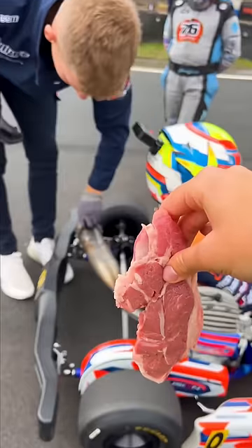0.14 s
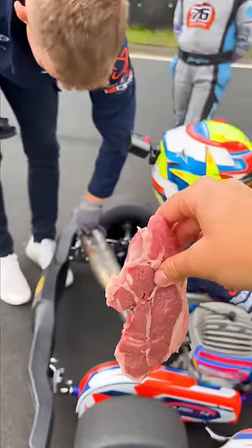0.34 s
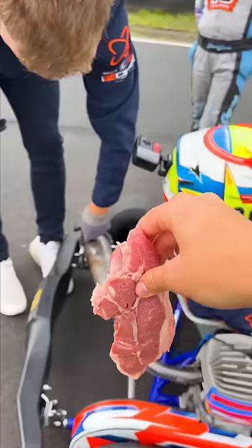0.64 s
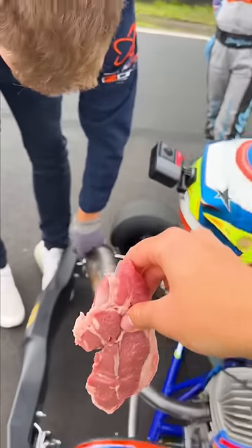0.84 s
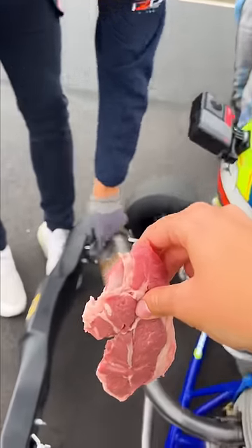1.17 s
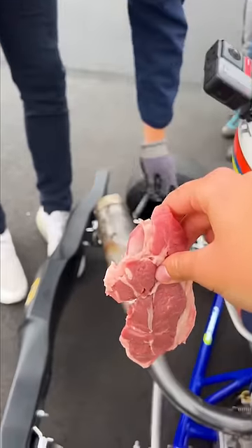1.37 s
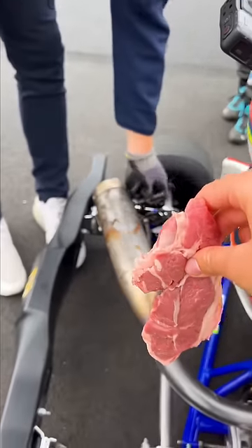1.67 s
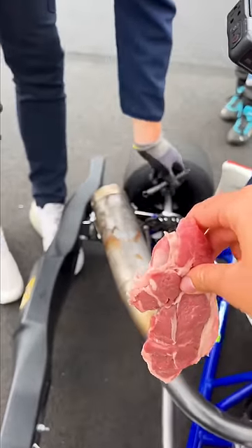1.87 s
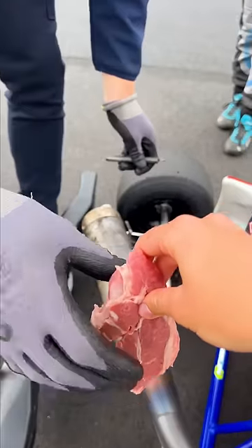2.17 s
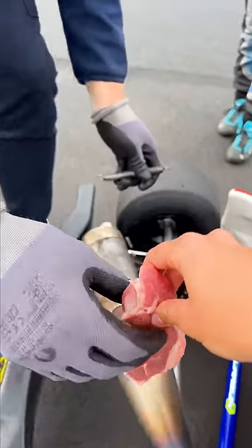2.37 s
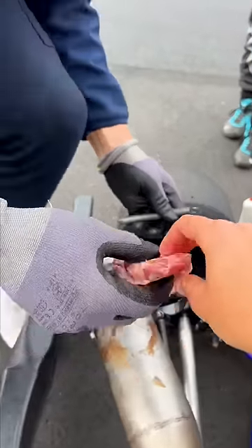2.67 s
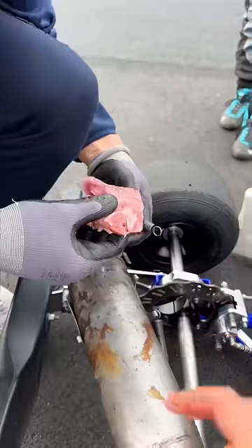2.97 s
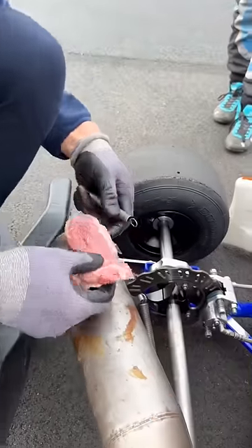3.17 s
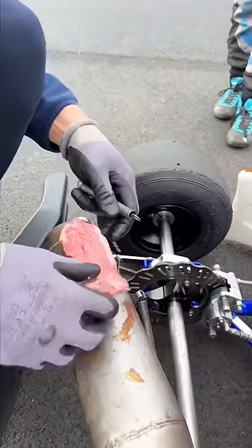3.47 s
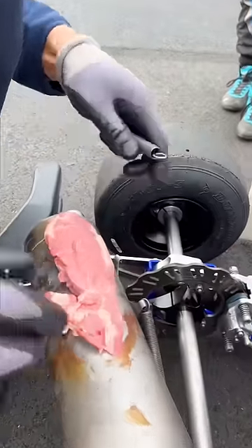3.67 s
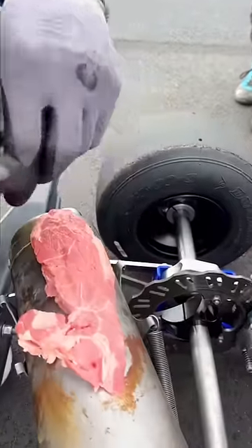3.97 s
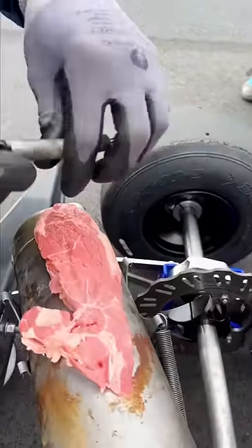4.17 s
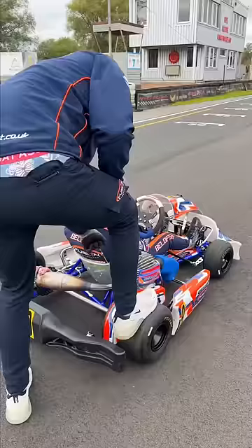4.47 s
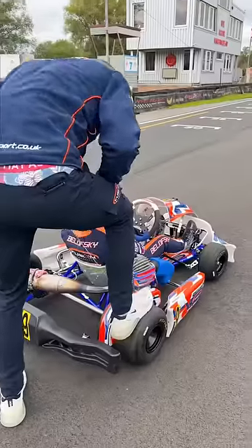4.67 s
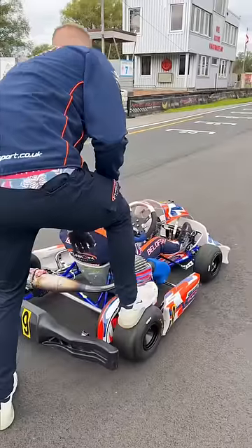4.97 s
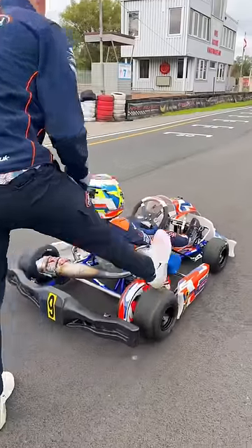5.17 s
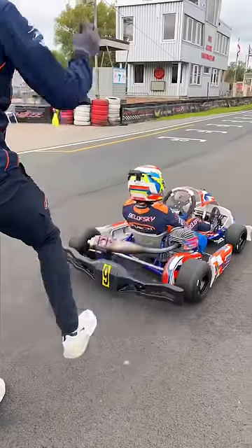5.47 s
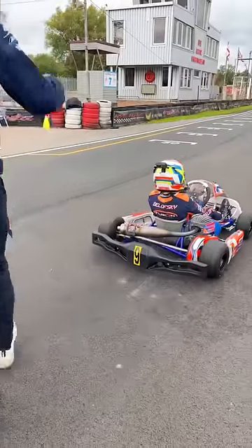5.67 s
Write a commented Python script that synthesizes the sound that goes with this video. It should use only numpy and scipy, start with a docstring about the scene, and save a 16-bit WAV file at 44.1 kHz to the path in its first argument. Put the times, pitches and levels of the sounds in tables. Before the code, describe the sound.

Quiet rustling and tool taps give way to a sizzle of meat, cut off by a go-kart engine starting and pulling away.

```python
"""A small two-stroke kart engine catches, fires every other turn, climbs to a steady drone and pulls away.
Its firings make a low pressure hump, a buzz of shaft orders and puffs of gas that ring the pipe.
Before it, and ended by a cut, comes a pit lane: low outdoor rumble, rustling shoes and sleeves, metal
clicks, one squeak of a spring, then meat sizzling on a hot exhaust. All of it is heard on a phone."""
import sys
import numpy as np
from scipy import signal
from scipy.fft import rfft, irfft, next_fast_len
from scipy.io import wavfile
from scipy.ndimage import uniform_filter1d

SR = 44100
rng = np.random.default_rng(int(sys.argv[2]) if len(sys.argv) > 2 else 0)


def store_pcm(level_fs):
    """Save levels as 16-bit WAV."""
    pcm = np.round(np.clip(level_fs, -1, 1) * 32767).astype(np.int16)
    wavfile.write(sys.argv[1], SR, np.atleast_2d(pcm).T)


N = 257544
T = np.arange(N) / SR


def amp(db):
    return 10 ** (np.asarray(db) / 20)


def unit(x):
    return x / np.sqrt(np.mean(x ** 2) + 1e-20)


def along(points, hz):
    """Read (Hz, value) points on a log frequency axis."""
    freqs, values = np.transpose(points)
    return np.interp(np.log(hz + 1), np.log(freqs + 1), values)


def curves(rows):
    """One value per sample for each column after the time."""
    times, *columns = np.transpose(rows)
    return [np.interp(T, times, column) for column in columns]


def span(rows):
    """A gate, open while a table lasts, with 3 ms edges."""
    return np.clip(np.minimum(T - rows[0][0], rows[-1][0] + .003 - T) / .003, 0, 1)


def wobble(rate):
    """A random curve, rate knots a second."""
    knots = rng.standard_normal(int(N * rate / SR) + 4)
    return np.interp(T * rate, np.arange(len(knots)), knots)


def filtered(x, response):
    """Pass x through a complex frequency response."""
    size = next_fast_len(N + SR // 2)
    return irfft(rfft(x, size) * response(np.fft.rfftfreq(size, 1 / SR)), size)[..., :N]


def modes(table):
    """Causal response of a set of resonances, alternating in sign."""
    return lambda f: sum((-1) ** k * amp(db) * 1j * f * width / (hz * hz - f * f + 1j * f * width)
                         for k, (hz, width, db) in enumerate(table))


def rush(spectrum=((20, 0),), patchy_db=0, grit_db=0):
    """Stereo noise of rms 1 with patches of random gain; grit makes it spiky."""
    cells = signal.stft(rng.standard_normal((2, N)) * amp(grit_db * wobble(1500)), nperseg=512)[2]
    patches = uniform_filter1d(uniform_filter1d(rng.standard_normal(cells.shape[1:]), 6, 0), 10, 1)
    pair = signal.istft(cells * amp(patchy_db * unit(patches)), nperseg=512)[1][:, :N]

    def colour_and_width(hz):
        angle = np.arccos(np.clip(ports(LIKENESS, hz), -1, 1)) / 2
        return amp(along(spectrum, hz)) * [np.cos(angle), np.sin(angle)]
    mid, side = filtered(pair, colour_and_width)
    return unit(np.array([mid + side, mid - side]))


def bursts(rows, colour, t60_s, pan_db=1):
    """A dying burst of grit at each (seconds, dB); positive pan leans left."""
    envelope, t = np.zeros(N + SR), np.arange(SR // 4) / SR
    for s, db in rows:
        envelope[round(s * SR):][:len(t)] += amp(db - 60 * t / t60_s) * (1 - np.exp(-t / 0.00082))
    return envelope[:N] * amp([[pan_db / 2], [-pan_db / 2]]) * rush(colour, patchy_db=3, grit_db=-2.5)


# Colours of the outdoor bed. Each row: frequency in Hz, relative level in dB.
RUMBLE = [(25, -30), (45, 16), (60, 18.5), (95, 14), (140, -42.5)]
DRONE = [(70, -2.5), (120, 8.5), (200, 5.5), (300, -41)]
TRAFFIC = [(130, -23.5), (220, -6.5), (326, -9), (371, -9.5), (642, -18.5), (868, -24.5), (1200, -28),
           (1460, -35), (5000, -56), (6500, -74), (11000, -120)]
# The bed's fader moves. Each row: time in seconds, rumble in dB, drone in dB.
AIR_LEVELS = [(0, -38.5, -50), (.13, -42, -38), (.24, -43, -42), (.32, -56, -60), (1.2, -58.5, -48),
              (1.8, -46.5, -47.5), (2.43, -51, -45.5), (2.7, -50, -43), (3.2, -48.5, -49),
              (3.85, -45, -43.5), (4.4, -49, -45.5), (4.45, -37, -39), (4.486, -35, -39)]
CUT_S = 4.486


def air():
    """Wind and far engines: a lumpy rumble and drone under dull traffic, up to the cut."""
    rumble_db, drone_db = curves(AIR_LEVELS)
    rumble = amp(rumble_db + 2.1 * wobble(7)) * rush(RUMBLE, patchy_db=-0.1)
    drone = amp(drone_db + 1.6 * wobble(16)) * rush(DRONE, patchy_db=0.4)
    passing_db = 5.5 * np.exp(-T / 0.35)  # a pass dies away at the start
    traffic = amp(-49.5 + passing_db + 0.96 * wobble(2.74)) * rush(TRAFFIC, patchy_db=2)
    return span([(0,), (CUT_S,)]) * (rumble + drone + traffic)


# Colours of soles and sleeves. Each row: frequency in Hz, relative level in dB.
SCUFF = [(410, -33), (700, 1), (1400, -1.5), (3370, -4.5), (3930, -10), (6180, -16.5), (7000, -17.5),
         (9100, -31), (15400, -120)]
CLOTH = [(2500, -25), (4500, -3), (6500, 0), (9000, -4), (12000, -7), (14000, -12), (16300, -18)]
# Body moves. Each row: peak time, rise and fall in seconds, scuff in dB, cloth in dB.
STROKES = [(.1, .08, 0.1, -57, -72), (.62, 0.18, 0.27, -54.5, -85), (.79, 0.1, 0.064, -52.5, -61.5),
           (.97, 0.053, 0.074, -55, -56.5), (1.094, 0.043, 0.061, -54.5, -52),
           (1.56, 0.067, 0.086, -69, -65), (1.9, 0.12, 0.13, -57, -52.5), (2.07, 0.15, 0.048, -55, -53.5),
           (2.2, 0.058, 0.032, -47, -50.5), (2.24, .03, 0.023, -47, -56),
           (2.431, 0.092, 0.037, -49.5, -61.5), (2.53, .07, 0.084, -60, -60.5),
           (2.62, 0.043, 0.17, -54, -59.5), (2.86, 0.17, 0.16, -69.5, -63), (3.148, .012, .015, -54, -59)]
STILL_SCUFF_DB, STILL_CLOTH_DB, RUSTLE_END_S = -61.5, -76, 3.184


def rustle():
    """Soles scuff on tarmac and jackets brush; each stroke swells and fades like a bell curve."""
    power = amp([[STILL_SCUFF_DB], [STILL_CLOTH_DB]]) ** 2
    for peak, rise, fall, *db in STROKES:
        swell = np.exp(-2 * ((T - peak) / np.where(T < peak, rise, fall)) ** 2)
        power = power + amp(db)[:, None] ** 2 * swell
    scuff_gain, cloth_gain = np.sqrt(power)
    scuff = scuff_gain * rush(SCUFF, patchy_db=1.1, grit_db=-1.5)
    cloth = cloth_gain * rush(CLOTH, patchy_db=1.5, grit_db=1.5)
    return span([(0,), (RUSTLE_END_S,)]) * (scuff + tool_ring(scuff) + cloth)


# Resonances of a hand tool. Each row: pitch in Hz, width in Hz, gain in dB.
TOOL_MODES = [(1620, 120, -22.5), (2444, 125, 4), (3320, 56, -26), (4760, 120, 5), (6530, 80, -13)]


def tool_ring(contact):
    """Steel in the hand rings along when rubbed or struck."""
    return amp(2.5) * filtered(contact, modes(TOOL_MODES))


# Colours of a contact, from top edge down to thud. Each row: frequency in Hz, relative level in dB.
SPIT = [(8000, -14.5), (10500, -2), (12500, 4), (16000, -10.5)]
SNAP = [(3000, -9.5), (5000, 0), (7000, 5.5), (9500, -0.5), (12000, -51)]
RING = [(2000, -40), (2250, -6), (2330, 1), (2420, -6), (2700, -39)]
CLACK = [(700, -24), (1500, 2.5), (2400, 3.5), (4000, -5), (6000, -16)]
THUD = [(150, -19), (300, -0.5), (450, -6.5), (800, -3), (1300, -5), (2500, -58)]
# Steel on steel. Each row: start in seconds, level in dB, top edge in dB relative to that.
CLICKS = [(.0928, -54.5, 4.5), (.2033, -52, -3), (0.4296, -41.5, -18), (0.441, -46, -10), (.694, -49, -14),
          (.7294, -46.5, -6), (.758, -50, 7), (.78, -53, -4), (0.8971, -29.5, 1.5), (1.0694, -44, 1),
          (1.0829, -44, -7), (1.11, -51, 0), (1.3796, -47.5, 3), (1.4064, -35.5, 5.5), (1.4312, -43, 0),
          (1.4417, -39, 1), (1.498, -36, 6.5), (1.5126, -36.5, 7.5), (1.5257, -52, 17), (1.603, -51, 19.5),
          (1.614, -53, 4), (2.5853, -53.5, 12.5), (2.7033, -56, -9), (3.1817, -54, 1)]
# Gloves and tools bump the can. Each row: start in seconds, blow in dB, hard edge in dB relative to that.
KNOCKS = [(0.4065, -22, -30), (0.4301, -9.5, -25.5), (.44, -10.5, -35), (0.453, -15.5, -40),
          (.694, -27, -13), (0.8977, -21, -20), (0.9105, -20.5, -28), (.997, -43, -5), (1.0694, -44, -10.5),
          (1.432, -27, -27), (1.5257, -36, -10), (1.87, -29, -22), (2.185, -22.5, -14.5),
          (2.2845, -37, -17.5), (2.4739, -17.5, -45), (2.5775, -22, -45), (2.588, -19, -40),
          (2.6006, -17, -50), (2.621, -21, -33), (2.64, -17.5, -28.5), (2.6544, -20, -37), (2.67, -23, -33),
          (3.028, -57, 3), (3.1428, -31, -17)]
# A steel part hums on. Each row: start in seconds, level in dB.
RINGS = [(.9, -54), (.95, -57), (1.0, -56), (1.072, -48.5), (1.11, -54.5)]
# The hollow exhaust can. Each row: pitch in Hz, width in Hz, gain in dB.
CAN_MODES = [(320, 126, -5.5), (463, 45, -2), (547, 46, -3), (828, 68, -5.5), (1030, 370, -18.5)]


def taps():
    """Clicks ring the tool; knocks ring the hollow can, and their hard edge the tool."""
    snap = bursts([(s, db) for s, db, top in CLICKS], SNAP, t60_s=0.071)
    spit = bursts([(s, db + top) for s, db, top in CLICKS], SPIT, t60_s=0.047)
    clack = bursts([(s, db + edge) for s, db, edge in KNOCKS], CLACK, t60_s=0.08)
    blow = bursts([(s, db) for s, db, edge in KNOCKS], THUD, t60_s=0.028, pan_db=3.5)
    hum = bursts(RINGS, RING, t60_s=0.26)
    return hum + snap + spit + clack + tool_ring(snap + clack) + filtered(blow, modes(CAN_MODES))


# The squeak's envelope. Each row: time in seconds, level in dB.
SQUEAK_LEVELS = [(0.97, -65), (0.994, -30.5), (1.014, -26.5), (1.06, -59)]
# The spring's tones. Each row: pitch in Hz, wavers a second, relative level in dB.
SPRING_TONES = [(10330, 60, 0), (10750, 300, -12), (9900, 400, -17), (11200, 400, -18)]


def squeak():
    """A spring slips over metal and whistles in a few narrow modes."""
    tones = sum(amp(db) * np.sin(2 * np.pi * hz * T + 3.8 * wobble(waver))
                for hz, waver, db in SPRING_TONES)
    level_db = curves(SQUEAK_LEVELS)[0] + 4.1 * wobble(370)
    return span(SQUEAK_LEVELS) * amp(level_db) * unit(tones) * amp([[.3], [-.3]])


# The sizzle's swell. Each row: time in seconds, fizz in dB, seethe in dB relative to the fizz.
FRY_LEVELS = [(3.17, -66.5, -33), (3.184, -48, -3), (3.216, -39.5, -15.5), (3.404, -33.5, -13.5),
              (3.672, -29, -11), (4.376, -30, -8), (4.482, -36, -7.5), (4.486, -37, -3)]
# Its two colours. Each row: frequency in Hz, relative level in dB.
FIZZ = [(1760, -27.5), (3000, -14.5), (4040, -22), (4750, -38.5), (5710, -3), (10600, 0.5), (11700, 3),
        (13700, -2), (15700, -1), (15850, -40)]
SEETHE = [(410, -51), (700, -22), (900, -21.5), (1160, -12.5), (2740, -8.5), (3600, -4), (4040, -0.5),
          (4400, -4.5), (6000, -4.5), (7800, -36), (13200, -120)]


def frying():
    """Juice boils on hot steel: dense, spiky fizz over a duller seethe."""
    fizz_db, seethe_db = curves(FRY_LEVELS)
    fizz = rush(FIZZ, patchy_db=1, grit_db=2.5)
    seethe = rush(SEETHE, patchy_db=1, grit_db=2.5)
    return span(FRY_LEVELS) * amp(fizz_db) * (fizz + amp(seethe_db) * seethe)


# The revs. Each row: time in seconds, shaft turns a second.
REVS = [(4.486, 37.2), (4.55, 41), (4.584, 47), (4.61, 51.72), (4.648, 58.85), (4.704, 67.08),
        (4.756, 70.2), (5.01, 70.8), (5.266, 69.4), (5.598, 70), (5.84, 66.5)]
# The engine's fader. Each row: time in seconds, level in dB, rasp in dB relative to that.
EXHAUST_LEVELS = [(4.486, -32, -8), (4.496, -26, -8), (4.53, -29.5, -8), (4.546, -24.5, -4),
                  (4.576, -27, -4), (4.614, -23, -5), (4.684, -25.5, -1.5), (4.74, -25.5, -4.5),
                  (4.884, -27.5, 2), (4.986, -26, -1.5), (5.058, -27, 3.5), (5.112, -27, -3),
                  (5.376, -30.5, -2), (5.84, -32.5, -4.5)]
# The engine settles. Each row: time in seconds, evenness from 0 to 1.
SETTLING = [(4.486, 0), (4.6, .15), (4.68, 1), (5.84, 1)]
# The kart pulls away. Each row: time in seconds, share of the far colour from 0 to 1.
LEAVING = [(4.486, 0.17), (5.1, 0.17), (5.3, 0.85), (5.84, 1)]
# The first firings, every other turn. Each row: start in seconds, pop in dB.
FIRST_FIRINGS = [(4.5445, -26), (4.588, -24.5), (4.6238, -26)]
# Colours of cranking gears and gas, low roar and pops. Each row: frequency in Hz, relative level in dB.
CRANK = [(240, -34), (400, -2), (791, 0), (894, -14), (1120, 1.5), (1410, -17), (2150, -13), (15000, -42)]
ROAR = [(30, -35.5), (60, -15), (150, 12.5), (350, 4.5), (600, -23.5)]
POP = [(300, -12), (500, 5.5), (1100, 5), (2000, -4.5), (3500, -4.5), (5300, -9), (9000, -6.5),
       (15000, -17)]
SPEED, EVEN, AWAY = curves(REVS)[0], curves(SETTLING)[0], curves(LEAVING)[0]
EXHAUST_DB, RASP_DB = curves(EXHAUST_LEVELS)


def engine():
    """A two-stroke cranks, catches with separate pops, then fires once a turn."""
    turns = np.cumsum(SPEED * span(REVS)) / SR + .14
    kicks = firings(turns)
    running = pressure_hump(turns) + buzz(turns) + gas_puffs(kicks) + piston_tick(kicks)
    crank = amp(-35) * (1 - EVEN) * rush(CRANK, patchy_db=1)
    roar = amp(EXHAUST_DB + by_stage(-7, -9.5, -13)) * rush(ROAR, patchy_db=3.5)
    pops = bursts(FIRST_FIRINGS, POP, t60_s=0.095, pan_db=0)
    return span(REVS) * (running + crank + roar) + pops


def by_stage(catching, near, leaving):
    """Crossfade a setting through the three stages of the run."""
    return (1 - EVEN) * catching + EVEN * ((1 - AWAY) * near + AWAY * leaving)


def unit_at_speed(x):
    """Scale to rms 1 over the steady drone."""
    return x / np.sqrt(np.mean(x[..., T > 4.8] ** 2))


def firings(turns):
    """One impulse of slightly random strength for each ignition."""
    first_s = np.transpose(FIRST_FIRINGS)[0]
    new_turn = np.flatnonzero(np.diff(np.floor(turns))) + 1
    fired = np.r_[np.round(first_s * SR).astype(int), new_turn[T[new_turn] > first_s[-1] + .01]]
    kicks = np.zeros(N)
    kicks[fired] = amp(rng.standard_normal(200)[:len(fired)])
    return kicks


# The silencer's low colour. Each row: frequency in Hz, gain in dB.
BOOM = [(38, -25), (50, -17), (62, -4), (70, -3.5), (78, 4), (113, 1.5), (140, 1), (170, -3.5), (210, -7.5),
        (280, -6.5)]


def pressure_hump(turns):
    """The four lowest shaft orders add up to one pressure hump that peaks late in the turn."""
    level_db = EXHAUST_DB + by_stage(-1.5, 0, 2.4)
    hump = 0
    for order in range(1, 5):
        thinning_db = AWAY * order  # 1 dB per order once far
        db = level_db - thinning_db + along(BOOM, order * SPEED) + 0.43 * order * wobble(12)
        hump += np.sqrt(2) * amp(db) * np.cos(2 * np.pi * order * (turns - .55) + .5 * wobble(5))
    return hump


# The pipe's colour, near and far. Each row: shaft order at cruising speed, relative level in dB.
NEAR_ORDERS = [(1, -3), (2, 0), (3, 21.5), (4, -17), (5, -16), (6, -41), (7, -25.5), (8, -22), (9, -24),
               (10, -13.5), (11, -10.5), (12, -27), (13, -19.5), (14, -16), (15, -8.5), (16, -9.5),
               (17, -14), (18, -21), (19, -24), (20, -41), (21, -43)]
FAR_ORDERS = [(1, -4), (2, 13), (3, 2), (4, -7), (5, -14.5), (6, -17.5), (7, -11), (8, -6), (9, -15.5),
              (10, -20), (11, -10), (12, -18), (13, -31), (14, -22), (15, -35), (16, -8.5), (17, -20.5),
              (18, -17), (19, -32), (20, -30), (21, -25), (22, -21), (23, -20), (24, -35), (25, -39),
              (26, -21), (27, -43), (28, -45), (29, -26), (30, -10.5), (31, -22), (32, -46)]
# Parts that sing at their own pitch. Each row: pitch in Hz, relative level in dB.
PANELS = [(1590, 2.5), (1728, 1.5), (1842, -3.5), (2150, -2)]
CRUISE_HZ = 70


def buzz(turns):
    """Higher shaft orders slide through the pipe's colour, each wavering alone; panels sing while near."""
    orders = 0
    for order in range(5, 33):
        near_db, far_db = (np.interp(order * SPEED / CRUISE_HZ, *np.transpose(colour), right=-34)
                           for colour in (NEAR_ORDERS, FAR_ORDERS))
        db = (1 - AWAY) * near_db + AWAY * far_db + 3.24 * wobble(12) + (RASP_DB + 4) * (order > 20)
        orders += amp(db) * np.sin(2 * np.pi * (order * turns + rng.random()) + 0.44 * wobble(12))
    panels = sum(amp(db + 2.9 * wobble(16)) * np.sin(2 * np.pi * hz * T + 1.76 * wobble(25))
                 for hz, db in PANELS)
    return amp(EXHAUST_DB - 1) * EVEN * (unit_at_speed(orders) + amp(RASP_DB - 8.5) * (1 - AWAY) * panels)


# Colours of the exhaust gas. Each row: frequency in Hz, relative level in dB.
BARK = [(150, -21), (250, -10), (408, -12.5), (764, -9.5), (902, -23), (1130, -17), (1400, -15.5),
        (1820, -58), (3080, -120)]
RASP = [(820, -23), (1400, -9.5), (1960, -5.5), (2100, -6.5), (2300, -8), (3500, -16.5), (4550, -43),
        (7700, -120)]
HISS = [(1470, -52), (2500, -2.5), (3210, -15.5), (4300, 2.5), (5480, -4.5), (7860, -8.5), (11500, -4.5),
        (15200, -12.5), (16300, -42)]
# Resonances of casing and pipe. Each row: pitch in Hz, width in Hz, relative gain in dB.
CASING_MODES = [(3550, 740, -2.5), (4350, 140, -2), (5530, 400, -3)]
PIPE_MODES = [(777, 34, 0.5), (1082, 100, -1), (707, 24, -8), (1010, 73, -5.5)]
PUFF_DECAY_S = 0.014


def gas_puffs(kicks):
    """Every firing blows a fading puff of gas noise, with casing clatter and a ringing pipe."""
    decays = signal.lfilter([.02], [1, -np.exp(-1 / (PUFF_DECAY_S * SR))], kicks)
    puff = unit_at_speed(0.016 * EVEN ** 3 + decays)
    bark = amp(-8.5) * (rush(BARK, patchy_db=0.5) + amp(RASP_DB + 3) * rush(RASP, patchy_db=3))
    hiss = amp(by_stage(-7, -4.5, -7.5)) * rush(HISS, patchy_db=2.5)
    clatter_db = by_stage(-10, -13, -9) + 1.8 * wobble(12)
    clatter = amp(clatter_db) * unit(filtered(rush(patchy_db=2.5), modes(CASING_MODES)))
    pipe = unit(filtered(rush(patchy_db=-2.5), lambda hz: modes(PIPE_MODES)(hz) ** 2))
    return amp(EXHAUST_DB) * puff * (bark + hiss + clatter + amp(-5 - 7.7 * EVEN) * pipe)


def piston_tick(kicks, near_hz=5170, far_hz=5860, t60_s=0.013):
    """The piston ticks in the casing, ringing for a few milliseconds after each firing."""
    last_firing = np.maximum.accumulate(np.where(kicks > 0, np.arange(N), 0))
    age = T - T[last_firing]
    hz = near_hz + (far_hz - near_hz) * AWAY[last_firing]
    level_db = EXHAUST_DB + by_stage(5, 2.5, 2.5) - 60 * age / t60_s
    attack = 1 - np.exp(-age / 0.00053)
    return kicks[last_firing] * amp(level_db) * attack * np.sin(2 * np.pi * hz * age)


def scene():
    return air() + rustle() + taps() + squeak() + frying() + engine()


# The phone's two microphone ports. Each row: frequency in Hz, likeness in a wide field from 0 to 1,
# left over right in dB, phase lead of the right in radians.
PORTS = [(64.3, 1, 0, 0.061), (172, 1, 1, 0.041), (342, 0.98, 1.5, 0.53), (633, 0.95, -5, 1.48),
         (865, 0.37, -3, 0.81), (1100, 0.19, -8.5, 0.78), (1310, 0.99, -4.5, 1.45), (1750, 0.96, 0, 0),
         (2450, 0.97, 0, 0.65), (2870, 1, -1, 1.41), (3820, 0.89, -1, 0.57), (4670, 0.43, 0.5, 0.0071),
         (6350, 0.43, 0, 0.71), (14800, 0.98, 0, 1.63)]
LIKENESS, BALANCE, LEAD = 1, 2, 3
TOP_HZ = 15900


def ports(column, hz):
    """One column of the microphone table, read at hz."""
    return along([(row[0], row[column]) for row in PORTS], hz)


def record(dry):
    """The two ports differ in strength and phase; the phone keeps nothing above its band limit."""
    def response(hz):
        side = np.array([[.5], [-.5]])
        return amp(side * ports(BALANCE, hz)) * np.exp(-1j * side * ports(LEAD, hz)) * (hz < TOP_HZ)
    return filtered(dry, response)


dry = scene()
out = record(dry)
store_pcm(out)
```